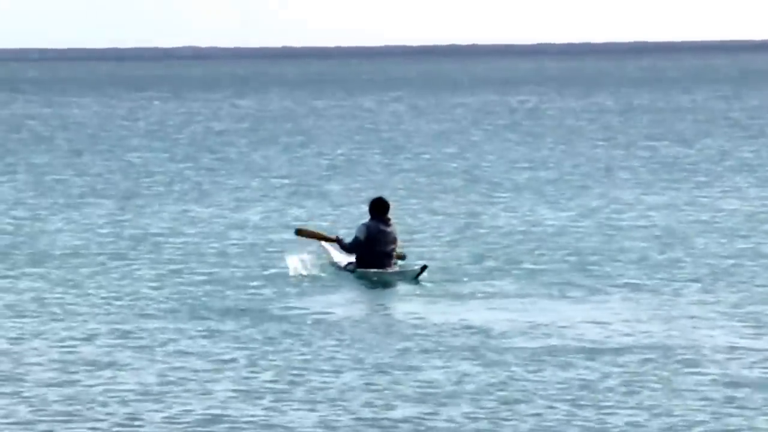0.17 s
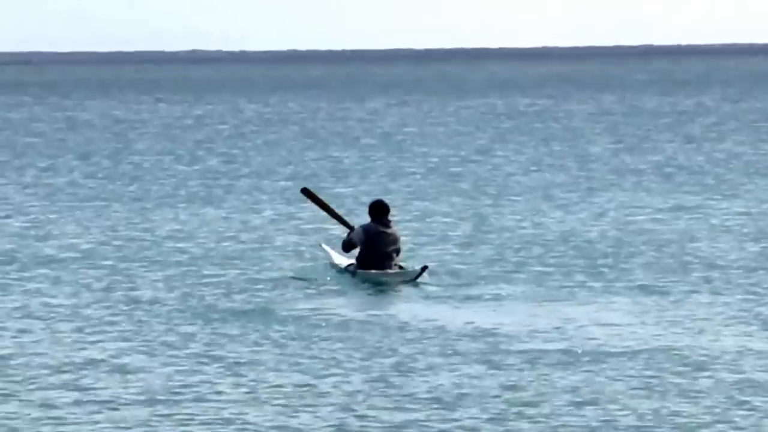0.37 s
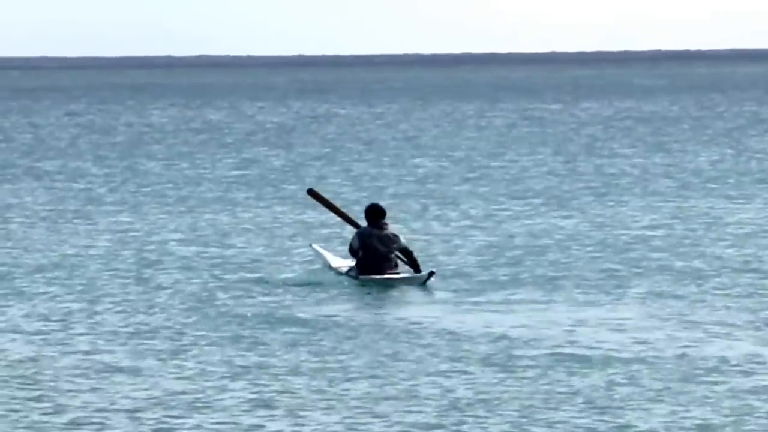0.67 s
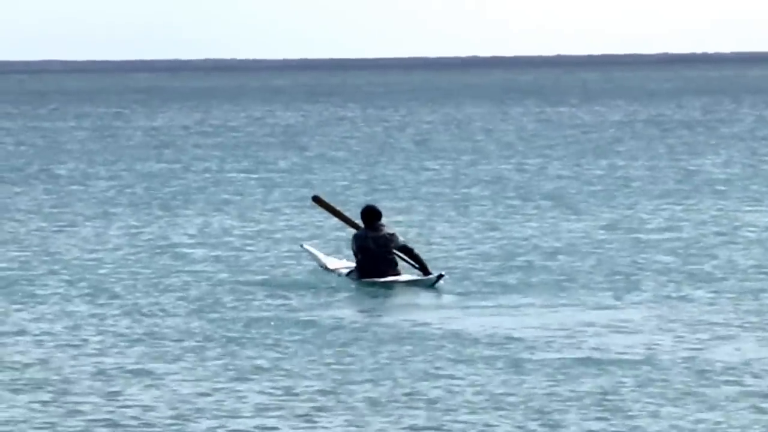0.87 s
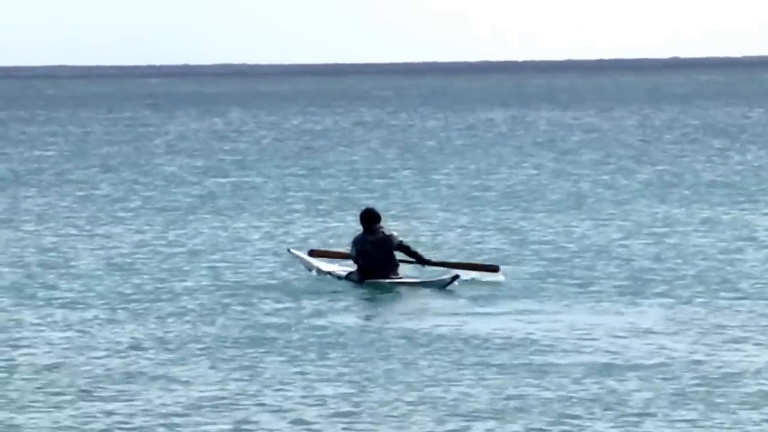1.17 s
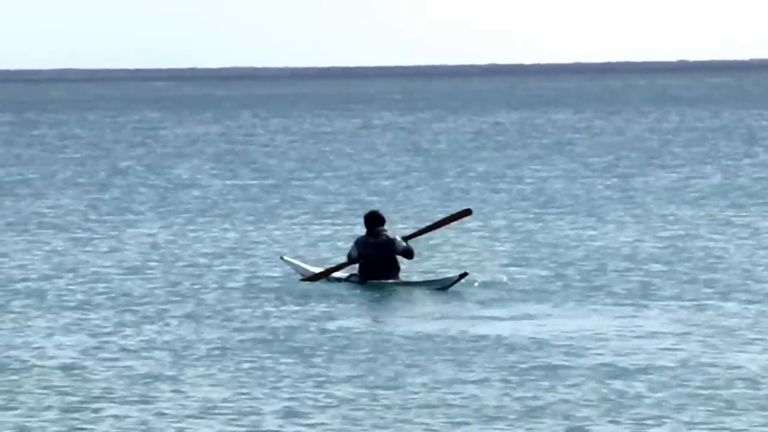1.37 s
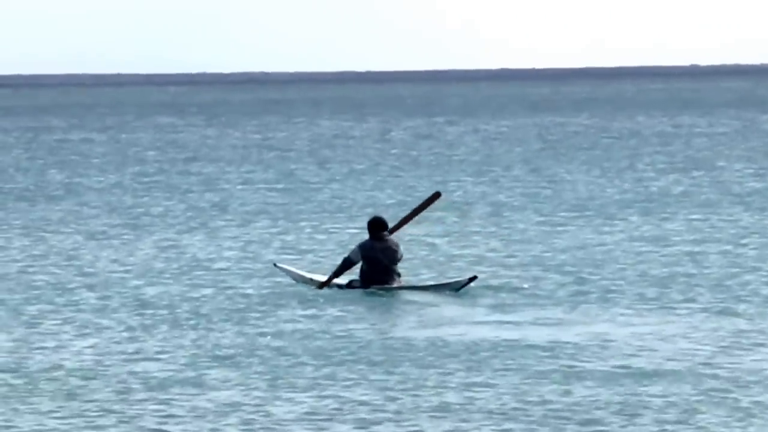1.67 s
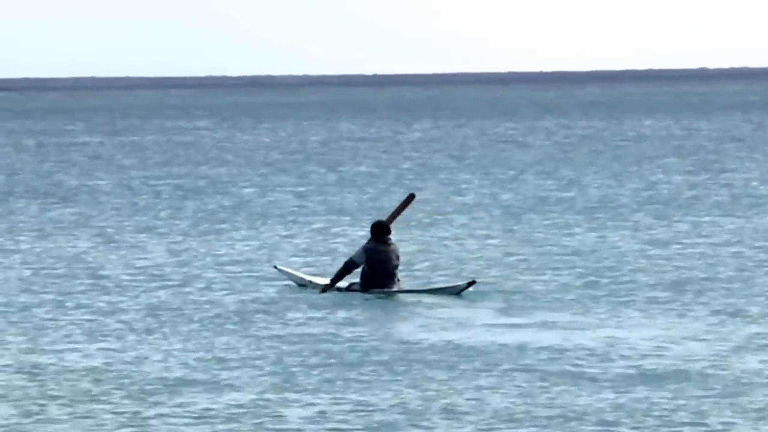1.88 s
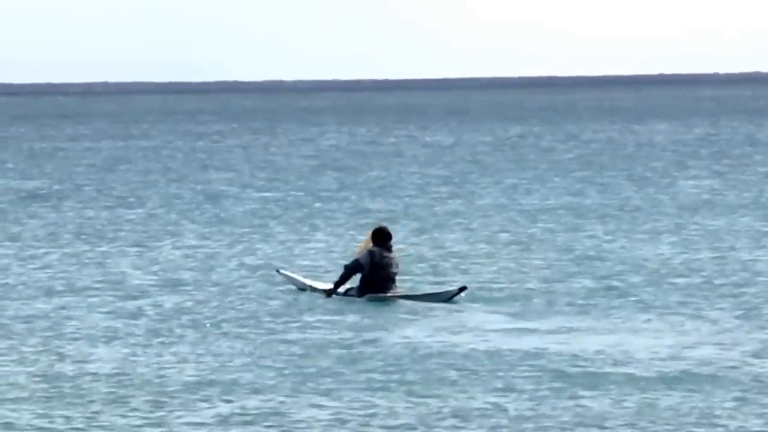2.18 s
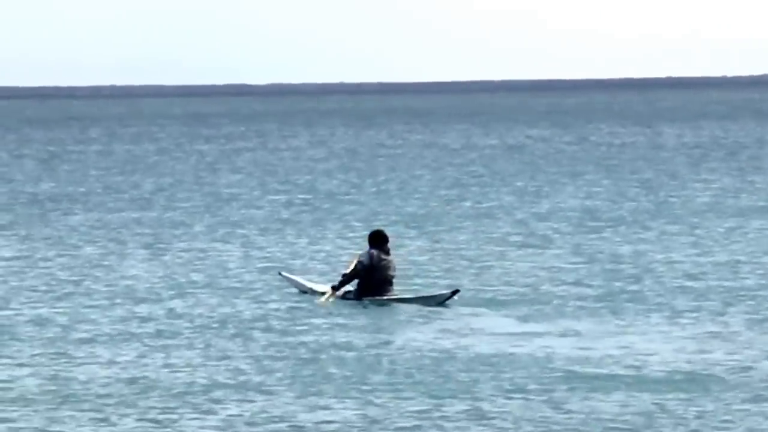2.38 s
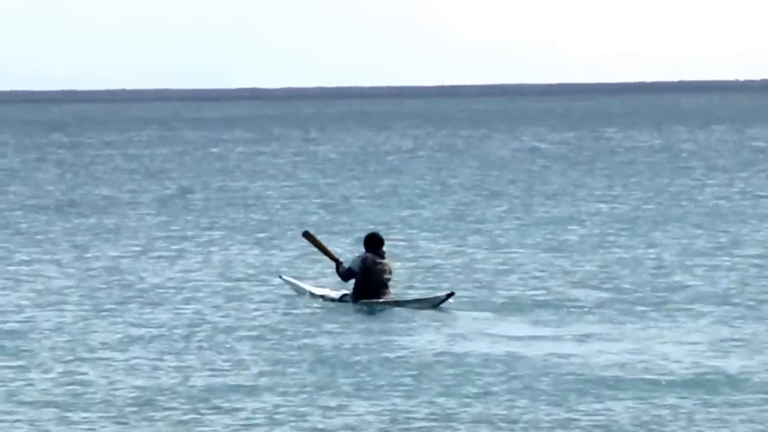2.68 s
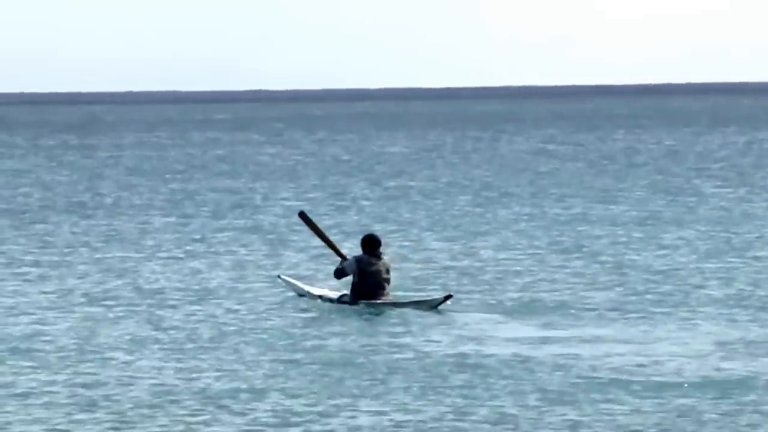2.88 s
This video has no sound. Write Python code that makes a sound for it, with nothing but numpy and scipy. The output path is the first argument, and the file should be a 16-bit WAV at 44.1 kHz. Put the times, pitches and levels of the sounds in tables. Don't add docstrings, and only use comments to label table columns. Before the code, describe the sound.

A small wave swells from near quiet, breaks with hollow slaps and foamy hiss, then drains away in bright drips and gurgles; outdoors by open water, close boxy microphone with faint wind rumble and hiss.

```python
import sys
import numpy as np
from scipy import signal
from scipy.fft import rfft, irfft, next_fast_len
from scipy.io import wavfile
from scipy.ndimage import uniform_filter1d, map_coordinates

SR = 44100
rng = np.random.default_rng(int(sys.argv[2]) if len(sys.argv) > 2 else 0)


def inscribe(sig):
    pcm = np.round(np.clip(np.atleast_2d(sig).T, -1, 1) * 32767)
    wavfile.write(sys.argv[1], SR, pcm.astype(np.int16))


def gain_from_db(level_db):
    decades = np.asarray(level_db, float) / 20
    return 10 ** decades


N = 132300


def along(points, hz):
    f, v = np.transpose(points)
    return np.interp(np.log(hz + 1), np.log(f + 1), v)


def over_time(points):
    return np.interp(np.arange(N) / SR, *np.transpose(points))


def unit(x):
    return x / np.sqrt(np.mean(x ** 2) + 1e-20)


def wobble(rate):
    return map_coordinates(rng.standard_normal(1000), [np.arange(N) * rate / SR])


def coloured(x, db_of_hz):
    m = 2 * next_fast_len(N // 2 + 4096)
    cepstrum = irfft(np.log(gain_from_db(db_of_hz(np.fft.rfftfreq(m, 1 / SR)))), m)
    cepstrum[1:m // 2] *= 2
    cepstrum[m // 2 + 1:] = 0
    return irfft(rfft(x, m) * np.exp(rfft(cepstrum)), m)[:N]


def rush(patchy_db):
    z = signal.stft(rng.standard_normal(N), nperseg=256)[2]
    field = uniform_filter1d(rng.standard_normal(z.shape), size=5, axis=0)
    field = uniform_filter1d(field, size=8, axis=1)
    return unit(signal.istft(z * gain_from_db(patchy_db * unit(field)), nperseg=256)[1][:N])


def bubbles(start_s, size, hz, cycles, rise, count):
    u = np.arange(count) / SR * hz[:, None] / cycles
    envelope = (2 * u * np.exp(1 - 2 * u)) ** 2
    ring = np.sin(2 * np.pi * cycles * (u + rise * u * u / 2))
    wave = size[:, None] * envelope * ring
    at = (np.round(start_s * SR).astype(int)[:, None] + np.arange(count)).ravel()
    return np.bincount(at, wave.ravel(), N + SR)[:N]


def cloud(lo_hz, hi_hz, cycles, spread_db, count, size):
    r = rng.random((count, 3))
    hz = lo_hz * (hi_hz / lo_hz) ** r[:, 1]
    loudness = gain_from_db(-spread_db * np.log(r[:, 2] + 1 / 50)) * np.sqrt(hz)
    return unit(bubbles(r[:, 0] * N / SR, loudness, hz, cycles, 0.14, count=size))


# pitch_hz, level_db
HOUSING = [(200, -21.5), (400, -16.5), (620, -3.5), (800, -6), (1030, -13.5), (1150, -6.5), (1290, 5),
           (1430, 4),
           (1650, -1.5), (2100, -7), (2800, -9), (3300, -11), (4250, -7), (4900, -8), (5800, -12),
               (6280, -24),
           (6800, -22.5), (7800, -23), (8600, -26.5), (10200, -26.5), (11200, -41), (16000, -57)]
# pitch_hz, half_width_hz, level_db
PORTS = [(4250, 300, 3), (8000, 270, 2.5), (2050, 86, -0.5), (1330, 92, 1.5)]


def housing(x, shape):
    def response_db(hz):
        ports_db = sum(db / (1 + ((hz - centre) / width) ** 2) for centre, width, db in PORTS)
        return along(HOUSING, hz) + ports_db + along(shape, hz)
    return unit(coloured(x, response_db))


# start_s, wash_level_db, big_bubble_share_db, fine_fizz_share_db
WAVE = [(0, -49.5, 8, 3.5), (.2, -48.5, 5, 4.5), (.33, -44.5, 4.5, 3.5), (.44, -43, 5, -1),
        (.5, -37, -1.5, 0), (0.569, -37.5, 3, -3), (.6, -31.5, -2, 1), (.69, -29.5, 1, -4),
        (.8, -30.5, 0.5, -5), (.95, -28, 0.5, 1), (1.17, -29, 2.5, 2), (1.27, -29.5, 1, 0),
        (1.47, -30.5, 1, 2), (1.68, -27.5, 1.5, 0.5), (1.92, -31.5, 1, 0.5), (2.1, -36, 1.5, 0),
        (2.45, -39, 2.5, -2), (3, -47.5, 2, 1)]


def wave_motion():
    t = np.arange(N) / SR
    s, *columns = np.transpose(WAVE)
    wash_db, big_db, fizz_db = [np.interp(t, s, column) for column in columns]
    churn_db = wash_db + 0.073 * wobble(10.3) + 0.81 * wobble(41.15)
    return wash_db, churn_db, big_db, fizz_db


# pitch_hz, level_db
FOAM = [(300, -21), (1500, -14.5), (2000, 1), (3000, 2.5), (4200, -8.5), (5500, -2), (8000, -2), (12000, 2)]


def foam(churn_db):
    grains = cloud(1410, 11200, 2.36, spread_db=0.5, count=6000, size=300)
    water = rush(patchy_db=-1.1) + gain_from_db(-6) * grains
    return housing(water, FOAM) * gain_from_db(churn_db + 0.2 * wobble(21.2))


# pitch_hz, level_db
FIZZ = [(1500, -44.5), (3300, -1.5), (3900, 0), (4700, -1), (5600, -6.5), (12000, -6.5)]


def fizz(churn_db, fizz_db):
    grains = cloud(2796, 7600, 1.7, spread_db=0.5, count=4000, size=150)
    water = rush(patchy_db=3.5) + gain_from_db(-4) * grains
    return housing(water, FIZZ) * gain_from_db(churn_db + fizz_db - 1.23 + 0.1 * wobble(28.66))


# pitch_hz, level_db
BIG = [(300, 2.5), (900, 5.5), (1500, 3.5), (1900, -2.5), (4000, -47)]


def big_bubbles(wash_db, churn_db, big_db):
    grains = cloud(348.0, 1946, 6.12, spread_db=0.5, count=1200, size=1500)
    water = rush(patchy_db=0.6) + gain_from_db(-12) * grains
    level_db = wash_db + 0.4 * (churn_db - wash_db) + big_db - 1.88
    return housing(water, BIG) * gain_from_db(level_db + 0.4 * wobble(10.16))


# pitch_hz, level_db
SPRAY = [(4000, -31), (5500, -7), (7000, 8), (10500, -4), (14000, -4)]
# start_s, level_db
SPRAY_THROW = [
    (.3, -58),
    (.578, -50),
    (.596, -42),
    (.75, -45.5),
    (.9, -46),
    (1.25, -49),
    (1.55, -46.5),
    (1.85, -48),
    (1.95, -69),
]


def spray():
    grains = cloud(5140, 11500, 2.5, spread_db=5.0, count=900, size=60)
    water = rush(patchy_db=3) + gain_from_db(-3) * grains
    return housing(water, SPRAY) * gain_from_db(over_time(SPRAY_THROW) + 1.3 * wobble(18))


def singles(table, cycles, rise, trim_db):
    start_s, peak_db, pitch_hz = np.transpose(table)
    return bubbles(start_s, gain_from_db(peak_db + trim_db), pitch_hz, cycles, rise, count=4000)


# start_s, peak_db, pitch_hz
SLAPS = [(0.2067, -15.5, 1280), (0.25, -22, 2260), (0.335, -16, 1630), (0.469, -19, 1950),
         (0.498, -15, 1920), (0.6506, -11, 1320), (0.663, -6, 1470), (0.68, -7, 1323), (0.697, -8, 1430),
         (0.746, -11, 1490), (.912, -9, 1330), (1.07, -20, 1460), (1.196, -10, 1910), (1.6233, -9, 1290),
         (1.677, -4, 1280), (1.691, -5.5, 1280), (1.711, -10, 1270), (1.917, -7.5, 1320),
         (1.951, -11, 1330), (2.0085, -13, 1300), (2.231, -18, 2160)]


def slaps():
    return singles(SLAPS, cycles=7, rise=0.059, trim_db=-10.5)


# start_s, peak_db, pitch_hz
DROPS = [(.245, -25, 4730), (.263, -30, 5240), (0.3098, -24, 4000), (0.33, -22, 3730), (.449, -26, 2740),
         (0.4626, -18, 4500), (0.466, -17, 3830), (0.5875, -19, 5400), (.608, -24, 3260),
         (1.246, -27, 2760), (1.3193, -11, 5850), (1.36, -26, 6800), (1.4605, -10.5, 3100),
         (1.5117, -10, 3950), (1.618, -12, 4540), (1.64, -8.5, 4250), (1.689, -13.5, 3030),
         (1.8914, -14, 4000), (1.8925, -14.5, 3300), (1.9545, -13, 4300), (1.651, -14, 2530),
         (1.94, -10.5, 3820), (2.029, -13, 4380), (2.1397, -13, 3920), (2.1498, -11, 3830),
         (2.1392, -18, 5200), (2.1502, -16, 4930), (2.175, -17, 4340), (2.247, -27, 6700),
         (2.339, -15.5, 4650), (2.37, -22, 4140), (0.446, -30, 7700), (.5392, -28, 7700),
         (1.493, -22, 8500)]


def drops():
    return singles(DROPS, cycles=5.5, rise=-0.038, trim_db=-4.5)


# start_s, peak_db, pitch_hz
TRICKLE = [(0.114, -32, 4520), (0.2047, -21, 2600), (0.2824, -21, 5030), (0.4284, -27, 4070),
           (0.5764, -24, 1950), (0.5861, -24, 2400), (0.6068, -21, 2220), (0.6634, -22, 2430),
           (0.6804, -14, 1940), (0.7764, -21, 2010), (0.9104, -19, 3700), (0.9554, -15, 4020),
           (0.9744, -21, 4190), (1.0694, -10.5, 2000), (1.0934, -21, 4100), (1.1064, -22, 2390),
           (1.1284, -17, 2040), (1.1384, -14, 4100), (1.218, -13, 4540), (1.2448, -21, 2730),
           (1.4064, -15, 2400), (1.4582, -10, 4050), (1.5604, -22, 4260), (1.5676, -9, 4330),
           (1.6005, -14, 4550), (1.749, -16, 2740), (1.7944, -7, 4150), (1.858, -18, 4150),
           (1.972, -8, 4080), (1.993, -17, 4280), (2.0267, -12.5, 2750), (2.0364, -18, 4400),
           (2.0478, -13, 4500), (2.0584, -15, 4070), (2.0994, -14, 4480), (2.2844, -30, 4170),
           (2.4024, -20, 4470), (2.4683, -15, 4070), (2.599, -21, 1820), (2.6594, -28, 1770),
           (2.7591, -25, 4260)]


def trickle():
    return singles(TRICKLE, cycles=5, rise=0.061, trim_db=-8.5)


# start_s, peak_db, pitch_hz
PLOPS = [(.197, -30.5, 565), (.206, -26, 547), (.218, -26.5, 508), (.212, -32, 840), (1.017, -26, 744),
         (1.056, -27, 674), (1.077, -25, 680), (1.479, -25.5, 600), (1.519, -23, 590), (1.577, -24.5, 593),
         (1.606, -25, 603), (1.675, -19, 700), (2.646, -28.5, 556)]


def plops():
    return singles(PLOPS, cycles=4.3, rise=0.018, trim_db=-2.9)


# start_s, peak_db, pitch_hz
GURGLES = [
    (.488, -33, 610),
    (.538, -30, 720),
    (1.533, -22, 690),
    (1.528, -25, 560),
    (1.64, -26, 560),
    (.822, -28, 750),
    (2.272, -40, 400),
    (.372, -35, 1130),
    (.612, -29, 570),
]


def gurgles():
    return singles(GURGLES, cycles=12.9, rise=0.113, trim_db=-3.1)


# start_s, peak_db, pitch_hz
TICKS = [(0.3605, -30.5, 8800), (0.43, -32, 8400), (.4366, -42, 10500), (.921, -32, 8500),
         (0.959, -21, 8000), (.99, -34, 10000), (.853, -24, 7500), (.9532, -28, 8350), (1.202, -26, 9300),
         (1.317, -27, 7560), (1.319, -18, 4140), (1.4187, -36, 6800), (1.7838, -30, 9500),
         (2.107, -32, 7000), (2.1458, -39, 13000), (2.1608, -33, 11800), (.868, -31, 8100),
         (.879, -36, 8200), (1.8858, -35, 10500), (2.0813, -39, 9800), (2.1332, -31, 6970),
         (2.186, -35, 9200), (2.3375, -30, 8300), (2.488, -46, 10500)]


def ticks():
    return singles(TICKS, cycles=3.3, rise=0.021, trim_db=0.051)


# pitch_hz, level_db
FAR = [(300, 8), (700, 6.5), (1300, -2.5), (2000, -4), (5000, 1.5), (10000, 4)]
# start_s, level_db
FAR_SWELL = [
    (0, -57),
    (.6, -80),
    (1.5, -50.5),
    (2.3, -39.5),
    (2.8, -39.5),
    (3, -40.5),
]


def far_surf():
    return housing(rush(patchy_db=0.6), FAR) * gain_from_db(over_time(FAR_SWELL) + 0.28 * wobble(7.1))


# pitch_hz, level_db
RUMBLE = [(12, -97), (20, 2), (70, -12.5), (114, -15), (225, -17.5), (261, -20), (400, -19), (520, -8),
          (880, -120)]


def wind():
    rumble = unit(coloured(rush(patchy_db=-1.5), lambda hz: along(RUMBLE, hz)))
    return gain_from_db(-49.5) * rumble * gain_from_db(0.71 * wobble(5.2))


# pitch_hz, level_db
HISS = [(300, -3.5), (3000, -5.5), (9000, -15.5), (12000, -18), (14600, -20), (15000, -22), (15800, -31)]


def recorder_hiss():
    noise = rng.standard_normal(N)
    return gain_from_db(-47.5) * unit(coloured(noise, lambda hz: along([(100, -51)] + HISS, hz)))


def scene():
    wash_db, churn_db, big_db, fizz_db = wave_motion()
    wave = foam(churn_db) + fizz(churn_db, fizz_db) + big_bubbles(wash_db, churn_db, big_db) + spray()
    splashes = slaps() + drops() + trickle() + plops() + gurgles() + ticks()
    background = far_surf() + wind() + recorder_hiss()
    return (wave + splashes + background)[None]


def low_pass(x):
    return signal.sosfilt(signal.butter(12, 15850, fs=SR, output="sos"), x)


def record(dry):
    notch_hz, notch_width_hz, notch_db, top_hz = 7420, 22, -24, 15730

    def response_db(hz):
        notches_db = sum(notch_db / k / (1 + ((hz - k * notch_hz) / (k * notch_width_hz)) ** 2)
                         for k in (1, 2))
        return notches_db - 70 * (hz > top_hz)
    mix = coloured(dry[0], response_db)[None]
    return low_pass(mix)


dry = scene()
out = record(dry)
inscribe(out)
```